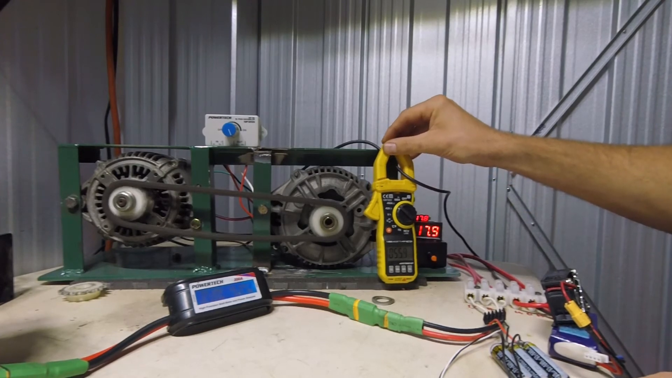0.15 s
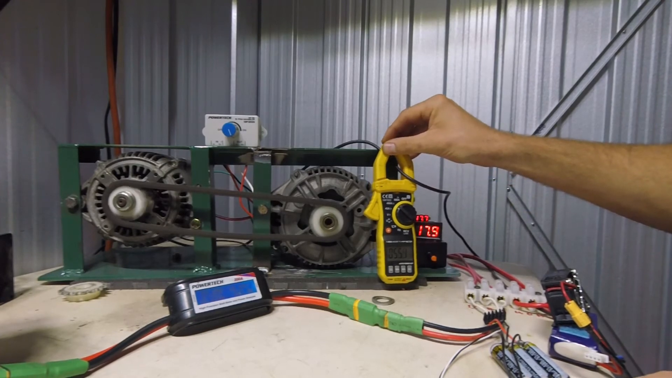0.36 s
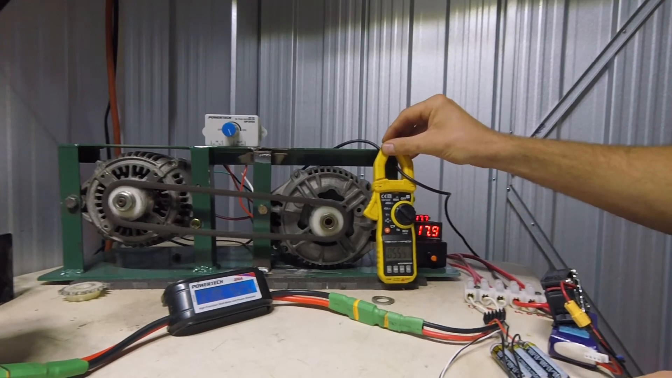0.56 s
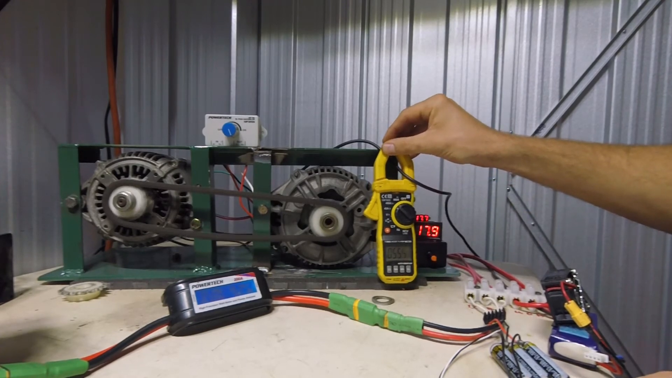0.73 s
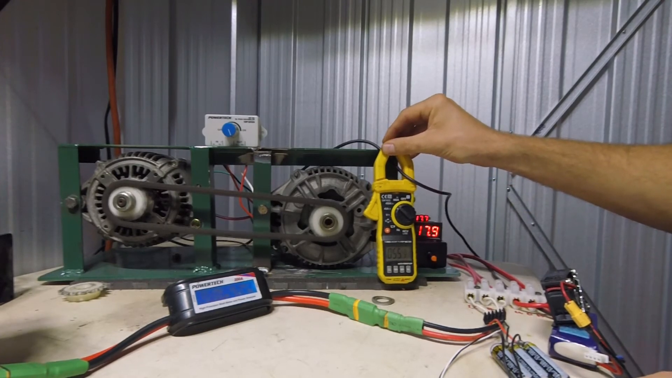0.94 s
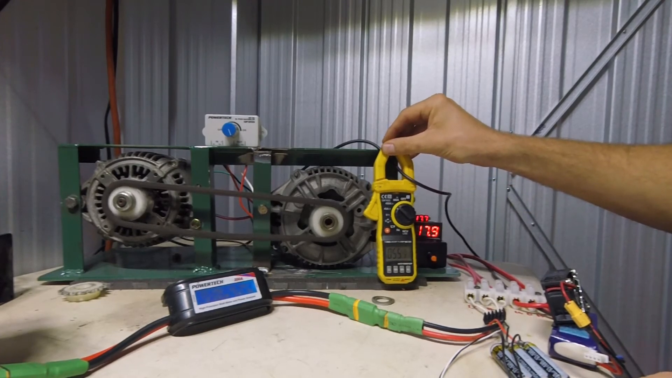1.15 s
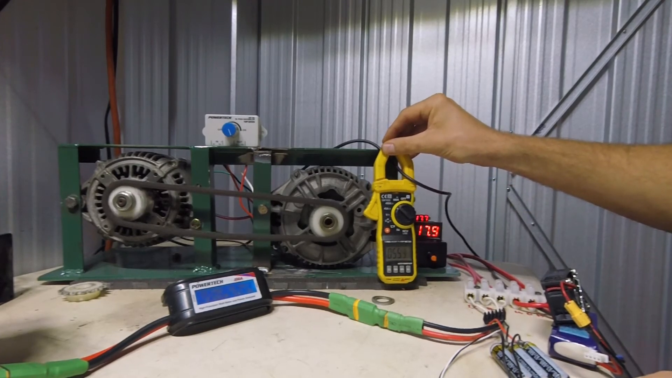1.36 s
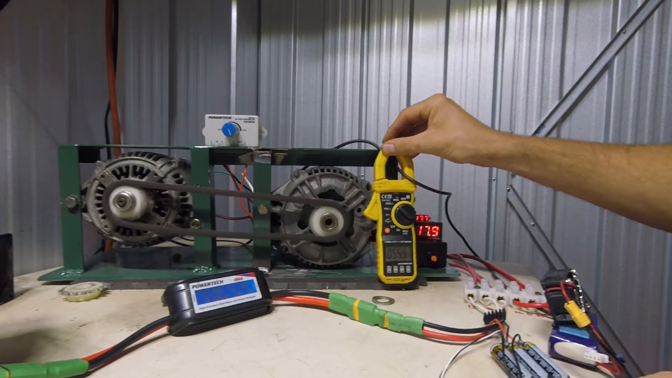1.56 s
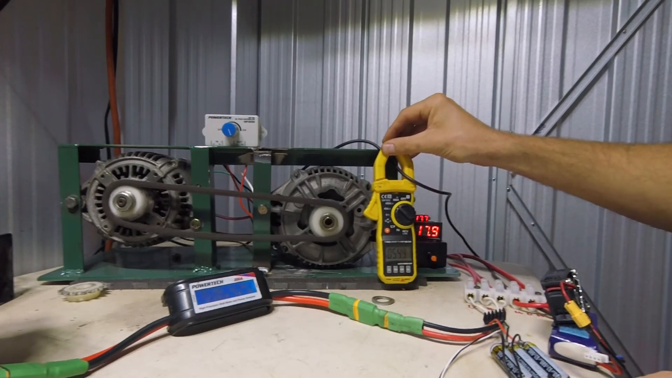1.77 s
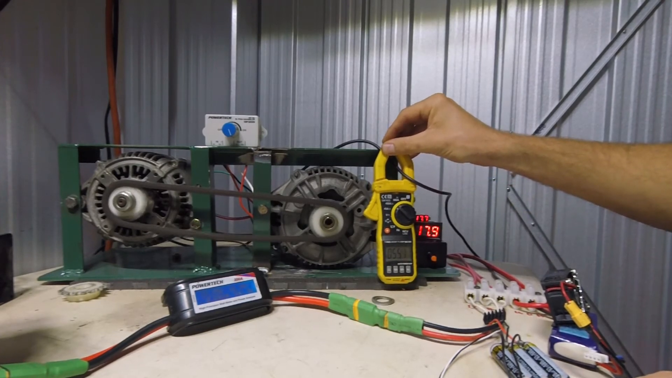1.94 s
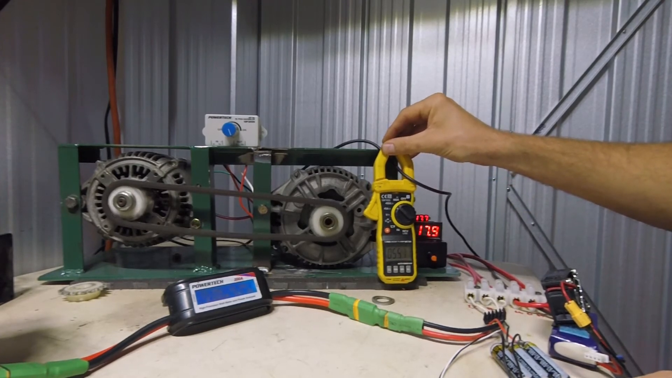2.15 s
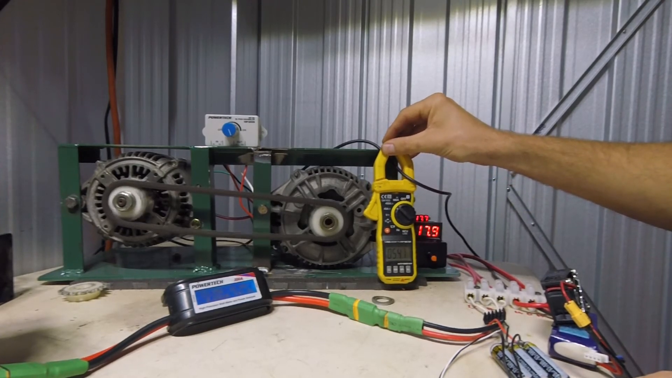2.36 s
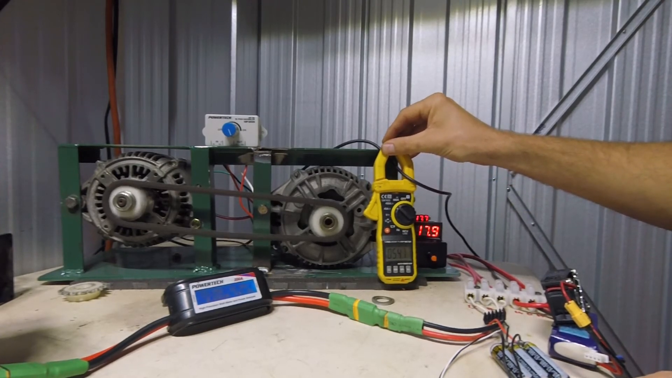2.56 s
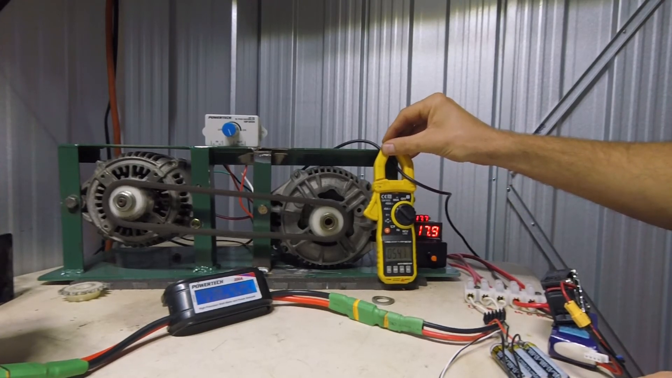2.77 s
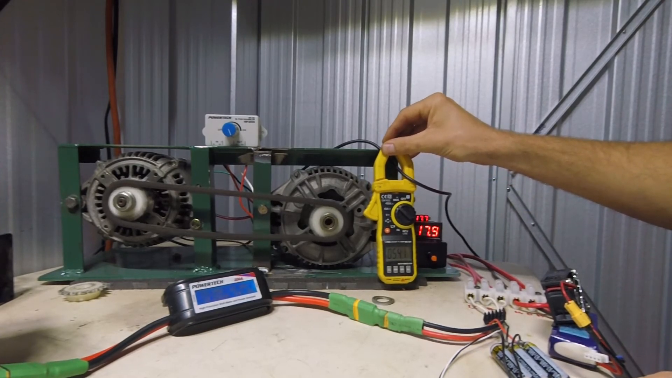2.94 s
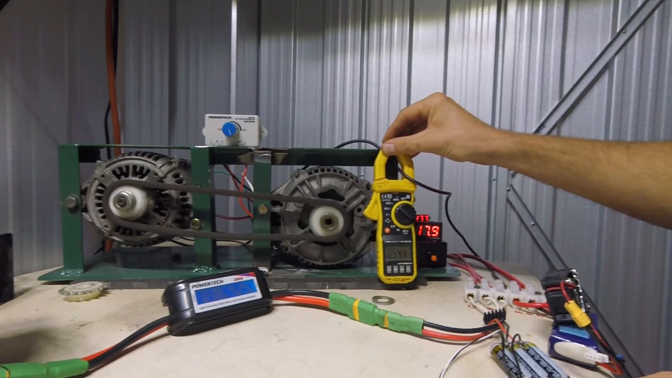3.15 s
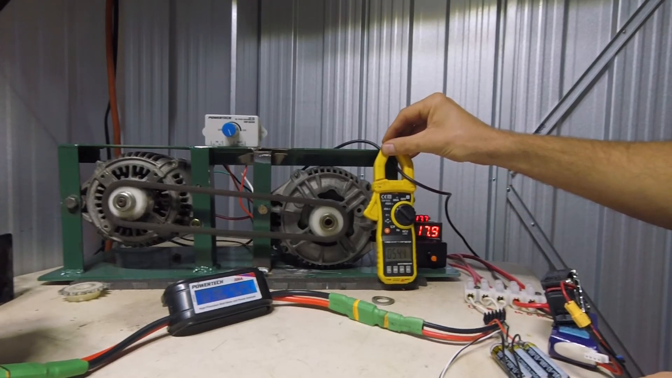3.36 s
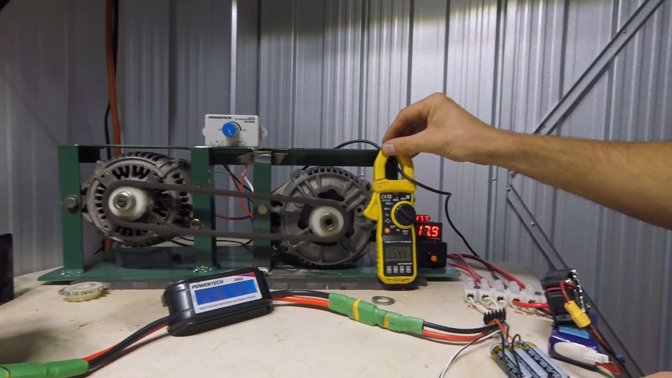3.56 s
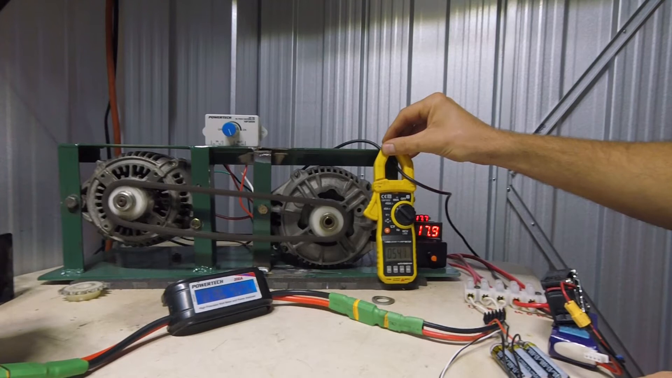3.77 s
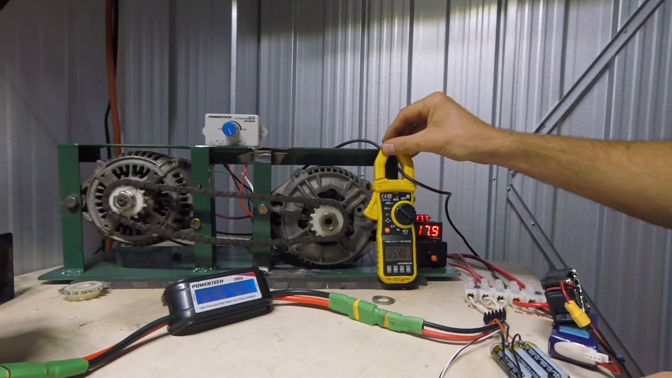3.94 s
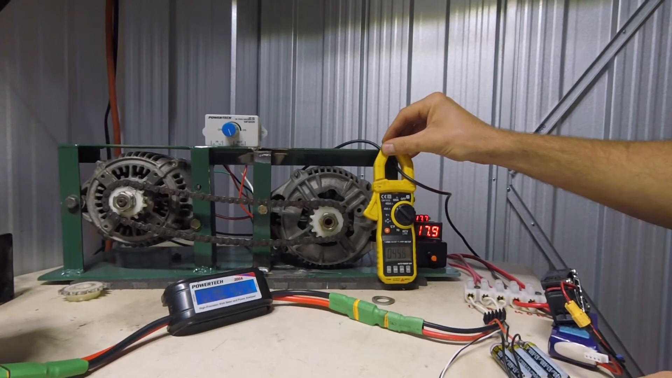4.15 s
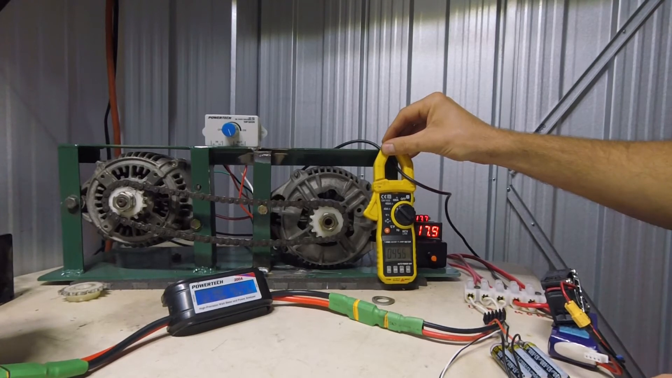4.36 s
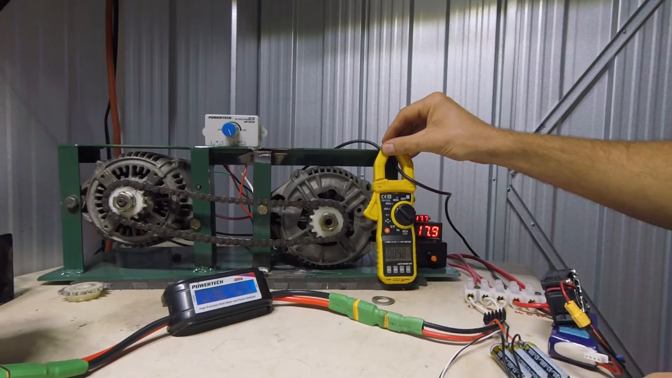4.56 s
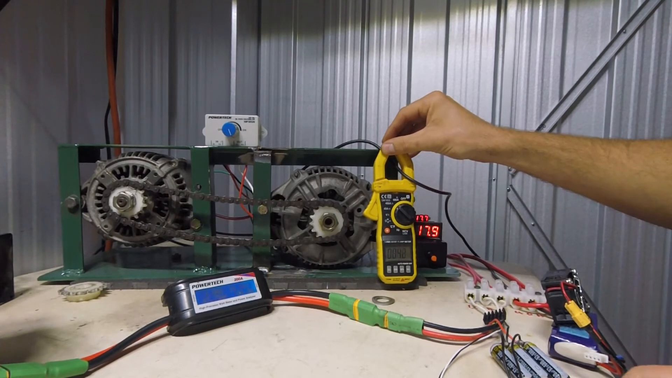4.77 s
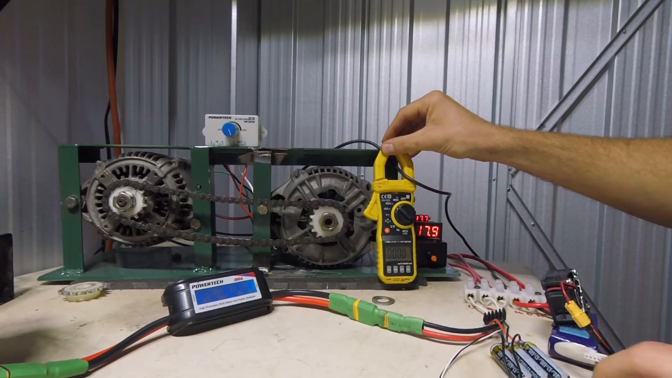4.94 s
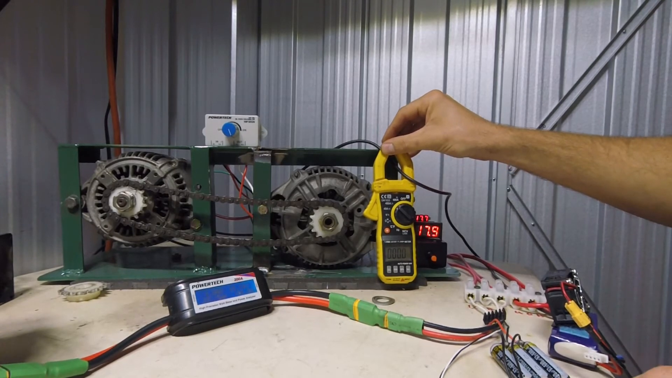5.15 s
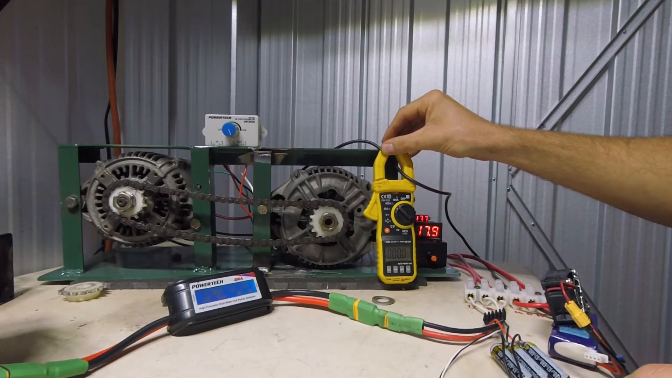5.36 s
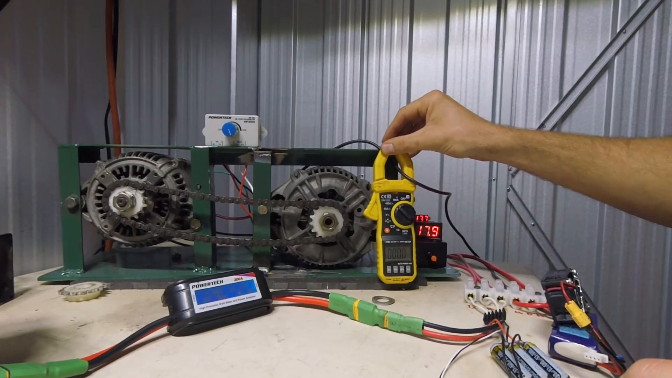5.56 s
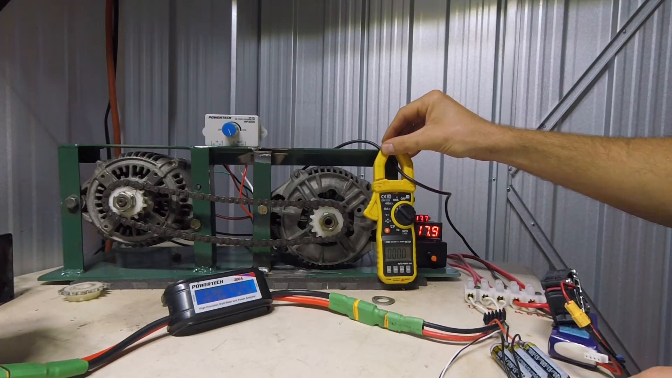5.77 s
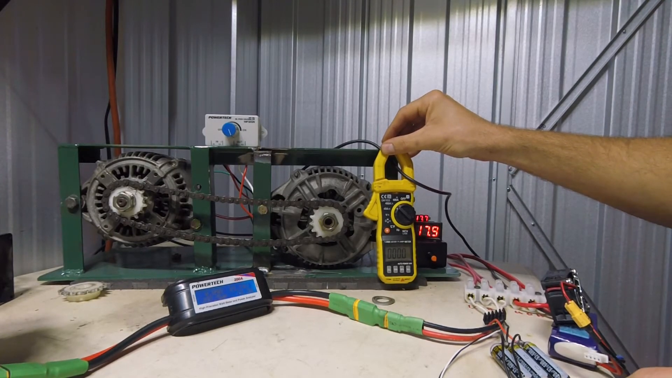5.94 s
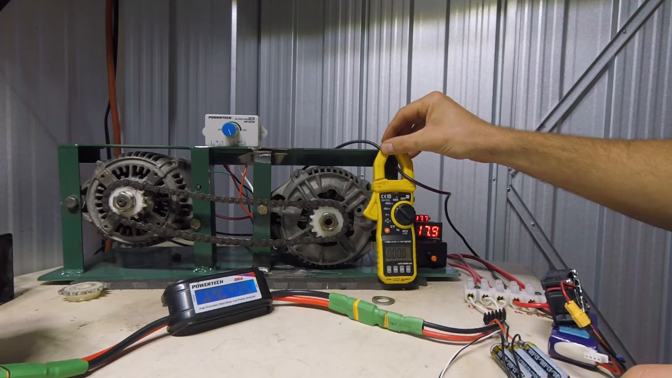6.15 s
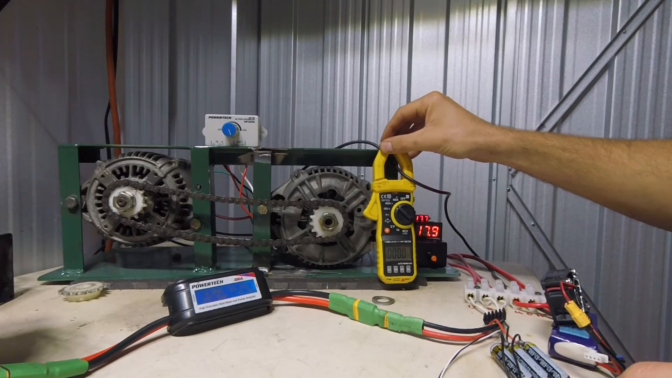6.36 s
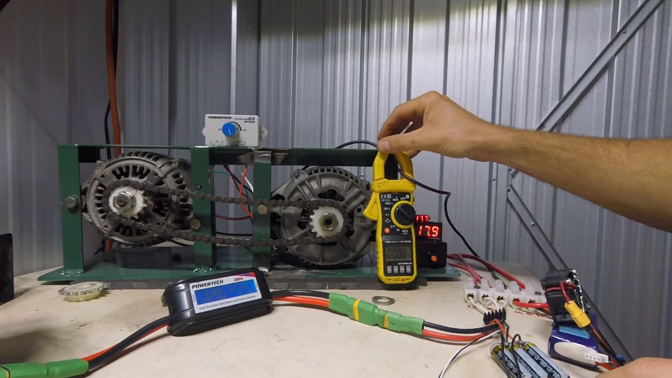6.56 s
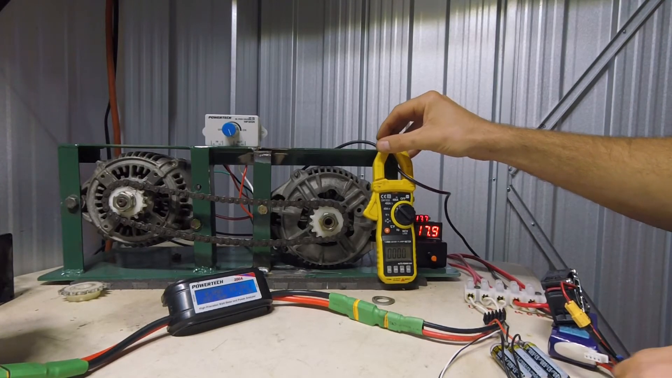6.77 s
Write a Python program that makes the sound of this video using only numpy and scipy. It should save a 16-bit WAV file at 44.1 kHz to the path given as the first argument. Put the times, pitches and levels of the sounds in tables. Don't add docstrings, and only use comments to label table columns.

```python
import sys
import numpy as np
from scipy import signal
from scipy.fft import rfft, irfft
from scipy.io import wavfile
from scipy.ndimage import uniform_filter1d

SR = 44100
rng = np.random.default_rng(int(sys.argv[2]) if len(sys.argv) > 2 else 0)


def waveform_to_disk(signal):
    frames = np.transpose(np.atleast_2d(signal))
    scaled = np.clip(frames, -1, 1) * 32767
    samples = np.round(scaled).astype(np.int16)
    wavfile.write(sys.argv[1], SR, samples)


def natural_amplitude(level_db):
    exponent = np.asarray(level_db, float) / 20
    return 10 ** exponent


N = 300321
T = np.arange(N) / SR
HZ = np.fft.rfftfreq(300000 + 2400, 1 / SR)
CUT_S = 3.76

# (time [s], turns so far [turns])
SHAFT = [
    (-.0447, -1),
    (.0548, 0),
    (.8505, 8),
    (1.3473, 13),
    (2.2463, 22),
    (3.1497, 31),
    (3.7544, 37),
    (6.9, 68),
]
TURNS = np.interp(T, *np.transpose(SHAFT))
PASSES = TURNS * 16


def evened(x):
    return x / np.sqrt(np.mean(x ** 2) + 1e-20)


def colour(points):
    hz, db = np.transpose(points)
    return natural_amplitude(np.interp(np.log(HZ + 1), np.log(hz), db, left=-120, right=-120))


def modes(peaks, steep=0.78):
    power = sum(natural_amplitude(2 * db) / (1 + (2 * (HZ - hz) / width) ** 2) ** steep for hz, width, db in peaks)
    top_hz = peaks[-1][0]
    return np.sqrt(power) / (1 + (HZ / (1.6 * top_hz)) ** 4)


def shaken(gain, drive=None):
    size = 2 * len(HZ) - 2
    force = rng.standard_normal(size)
    if drive is not None:
        force = force * np.resize(drive, size)
    return evened(irfft(rfft(force) * gain)[:N])


def drift(hz):
    return shaken(1 / (1 + (HZ / hz) ** 4))


def held(x):
    span = round(.07 * SR)
    power = uniform_filter1d(uniform_filter1d(x ** 2, span), span)
    return x / np.sqrt(abs(power) + 0.12)


def dying(start, db_per_s):
    return natural_amplitude(-db_per_s * np.maximum(T - start, 0))


def wavering(hz, db, wander, swell_db):
    phase = 2 * np.pi * (hz * T + rng.random()) + wander * drift(5.6)
    return np.sqrt(2) * natural_amplitude(db + swell_db * drift(4.5)) * np.sin(phase)


def add(mix, s, sound):
    part = mix[round(s * SR):][:len(sound)]
    part += sound[:len(part)]


def shed_air():
    # (frequency [Hz], level [dB per Hz])
    air_colour = [(40, -14), (110, -4.5), (250, -0.5), (340, -6), (450, -14), (750, -14.5), (930, -10),
                  (1150, -15.5), (1900, -20.5), (2700, -15), (3100, -22), (3900, -25.5), (4500, -33),
                  (15500, -37)]
    return natural_amplitude(-41) * shaken(colour(air_colour), natural_amplitude(.4 * drift(8)))


def cooling_fan():
    # (frequency [Hz], level [dB])
    fan_lines = [(285.3, -54), (306.8, -53), (495.3, -52.5), (689.1, -52.5), (796.7, -58), (925.9, -64),
                 (974.4, -75.5), (1136, -72), (1378, -56), (1421, -58.5), (1701, -64), (1766, -66.5),
                 (2073, -61.5), (2223, -70), (2369, -87.5), (2756, -57.5), (3451, -70), (5518, -77.5),
                 (6218, -88)]
    return sum(wavering(hz, db, wander=hz / 900, swell_db=1.0) for hz, db in fan_lines)


def knock(hz, spread, t60, count):
    t = T[:round(.15 * SR)]
    chance = rng.random((count, 3))
    place = 2 * (np.arange(count)[:, None] + chance[:, :1]) / count - 1
    cycles = hz * np.exp(spread * place) * t
    rings = np.exp(-2 * place ** 2) * np.sin(2 * np.pi * (cycles + 0.4 * chance[:, 1:2]))
    decay = natural_amplitude(-60 * t * np.exp(.5 * place) / (t60 * (.5 + chance[:, 2:])))
    onset = np.sin(np.minimum(t * hz, np.pi / 2)) ** 2
    burst = (rings * decay).sum(0) * onset
    return burst / abs(burst).max()


def finger_taps():
    # (time [s], peak level [dB], centre [Hz], time to fall 60 dB [s], dry tick against knock [dB])
    touches = [
        (4.759, -41, 1800, 0.03, 0),
        (4.82, -36, 2000, 0.06, 0),
        (4.889, -24.5, 900, .05, -20),
        (4.98, -32, 1000, .08, -16),
        (5.714, -46, 1000, .04, -8),
        (6.03, -43, 990, .04, -8),
    ]
    out = np.zeros(N)
    for s, db, hz, t60, tick_db in touches:
        hollow = knock(hz, 1.0, t60, count=14)
        dry_tick = knock(3000, 0.8, 0.12, count=24)
        add(out, s, natural_amplitude(db) * (hollow + natural_amplitude(tick_db) * dry_tick))
    return out


def swaying_bench():
    # (frequency [Hz], width [Hz], level [dB])
    thud_modes = [(31.6, 4.2, 6), (54.8, 16, -12), (78.3, 12, -1.5), (89.3, 7.6, -11.5),
                  (199.6, 10.4, -8.5)]
    # (time [s], level [dB])
    settling = [
        (3.9, -15),
        (4.03, -23),
        (4.21, -24),
        (4.5, -31),
        (4.9, -30.5),
        (5.36, -30.5),
        (5.44, -35),
        (5.9, -36),
        (6.81, -53),
    ]
    from_s, sway_hz = 3.9, 17.8
    onset = np.clip((T - from_s) / .12, 0, 1)
    rocking = np.sqrt(2) * np.sin(2 * np.pi * sway_hz * T + 0.33 * drift(3)) * natural_amplitude(2 * drift(5))
    thuds = natural_amplitude(np.interp(T, *np.transpose(settling))) * held(shaken(modes(thud_modes)))
    return onset * (natural_amplitude(-25) * dying(from_s + .25, 15) * rocking + thuds)


def surges_and_drones():
    # (middle [s], length [s], level [dB], frequency [Hz])
    surges = [(.03, .2, -21, 178), (.45, .25, -24, 178), (.95, .45, -20, 176), (1.45, .3, -22, 180),
              (1.87, .2, -20, 179), (2.13, .35, -22, 180), (.25, .15, -24, 302), (.55, .3, -24, 300),
              (1.25, .35, -23, 363), (2.15, .35, -25, 300), (3.1, .4, -25, 302)]
    # (middle [s], length [s], level [dB], frequency [Hz])
    drones = [(4.61, 1.0, -36, 136), (5.13, .3, -40, 137), (5.51, .55, -40, 136), (6.09, .3, -43, 137),
              (6.34, .35, -42, 137), (6.66, .4, -46, 137), (4.31, .2, -37, 177), (4.81, .7, -37, 177),
              (5.79, .6, -38.5, 177), (6.11, .2, -43, 177), (6.7, .55, -37, 177)]
    panel_width_hz = 1.62
    unsteady = held(shaken(1 / (1 + (2 * HZ / panel_width_hz) ** 2)) + 1.546)
    out = np.zeros(N)
    for s, length, db, hz in surges + drones:
        swell = np.cos(np.pi * np.clip((T - s) / length, -.5, .5))
        tone = np.sqrt(2) * np.sin(2 * np.pi * (hz * T + rng.random()) + .7 * drift(4))
        out += natural_amplitude(db) * swell * unsteady * tone
    return out


def jolt():
    # (start [s], hold [s], frequency [Hz], level [dB], release [dB per s])
    rung = [
        (3.785, .07, 49, -13.5, 115),
        (3.79, .05, 33, -23, 65),
        (3.76, .06, 86, -19.5, 85),
        (3.8, .1, 178, -18.5, 160),
        (3.75, .02, 214, -21, 400),
        (3.79, .04, 300, -19.5, 450),
        (3.79, .055, 397, -18.5, 500),
    ]
    rise_s = .03
    out = np.zeros(N)
    for s, hold, hz, db, release in rung:
        swell = np.clip((T - s) / rise_s, 0, 1) * dying(s + rise_s + hold, release)
        out += swell * natural_amplitude(2 * drift(36)) * wavering(hz, db, wander=.5, swell_db=.5)
    return out


def tick(hz):
    # (frequency [Hz], level [dB])
    overtones = [(4300, -7), (5100, -17), (6100, -20), (10500, -38)]
    t = T[:260] - .0013
    phase = rng.random()
    rings = 0
    for f, db in [(hz, 0)] + overtones:
        rings = rings + natural_amplitude(db) * np.cos(2 * np.pi * (f * t + phase + .2 * rng.random()))
    strike = np.exp(-.5 * (t / .00027) ** 2)
    rattle = .15 * np.exp(-.5 * ((t - .0014) / .0009) ** 2)
    return .8 * rings * (strike + rattle)


def spinning():
    return dying(CUT_S, 103)


def ball_passes():
    passing = (np.diff(np.floor(PASSES), prepend=-9) > 0) * (TURNS % .5 > .02)
    rattle_db = 9 * np.exp(-(TURNS % 1) / .1)
    size = passing * spinning() * natural_amplitude(-33 + rattle_db + 3 * rng.standard_normal(N))
    shape = rng.integers(0, 8, N)
    out = np.zeros(N)
    for k in range(8):
        out += signal.oaconvolve(size * (shape == k), tick(rng.uniform(2760, 4110)))[:N]
    return out


def bearing_flaws():
    places = [0, .5, .755]
    # (first flaw [dB], second flaw [dB], third flaw [dB])
    load_cycle = [(-23, -36, -23), (-20.5, -36, -36), (-19.5, -33, -28), (-25, -23, -36), (-18.5, -29, -21),
                  (-21, -23, -33), (-25, -22, -29), (-23, -26, -36), (-17.5, -23.5, -23.5)]
    out = np.zeros(N)
    s, turns = np.transpose(SHAFT)
    for turn in range(38):
        for place, db in zip(places, load_cycle[turn % len(load_cycle)]):
            when = np.interp(turn + place, turns, s)
            level = natural_amplitude(db + 1.0 + 1.0 * rng.standard_normal())
            hz = 3520 * np.exp(.06 * rng.standard_normal())
            add(out, when, (when < CUT_S) * level * tick(hz))
    return out


def bearing_hiss():
    # (frequency [Hz], level [dB per Hz])
    hiss_colour = [(1450, -31.5), (1650, -23.5), (1900, -10.5), (2400, -3.5), (2900, -8.5), (3600, -6.5),
                   (4300, -9), (4550, -17), (5300, -16), (5750, -15.5), (5900, -12), (6600, -21),
                   (7700, -29.5), (15500, -31)]
    ball_throb_db = 1.5 * np.cos(2 * np.pi * PASSES)
    turn_throb_db = 1 * np.cos(2 * np.pi * (TURNS - 0.034))
    throb = natural_amplitude(.9 * drift(40) + ball_throb_db + .3 * drift(12) + turn_throb_db)
    return natural_amplitude(-34.5) * spinning() * shaken(colour(hiss_colour), throb)


def ringing_cases():
    # (frequency [Hz], width [Hz], level [dB])
    case_modes = [(483.2, 4.9, -2), (501, 44, -13.5), (624.3, 9.6, -8), (666, 17, -11), (744, 13, -7),
                  (850, 24, -11.5), (901.5, 6.4, -1), (968, 30, -7), (1066, 11, -2), (1120, 42, -6),
                  (1112, 9.2, -11), (1169, 8.5, 0), (1270, 9.9, -6.5), (1285, 15, -6.5), (1366, 44, -7),
                  (1387, 21, -3.5), (1492, 25, -8), (1646, 14, -14)]
    coasting = dying(CUT_S, 70) * dying(3.855, 105)
    return natural_amplitude(-22) * coasting * shaken(modes(case_modes, steep=0.76), natural_amplitude(0.16 * drift(30)))


def shaken_rig():
    # (frequency [Hz], width [Hz], level [dB])
    bench = [(17.8, 3, -10), (35, 10, -15.5), (50.7, 1.2, 11.5), (88.5, 8.4, -2), (104, 10, -37)]
    # (frequency [Hz], width [Hz], level [dB])
    boards = [(125.5, 5.6, -14.5), (153, 4, -12), (178.5, 3.6, 0)]
    # (frequency [Hz], width [Hz], level [dB])
    frame = [(228, 24, -20.5), (304, 19.3, 5.5), (332.4, 15, -1.5), (365.9, 7.5, 4.5), (399, 35, -7),
             (413.4, 39, -15)]
    laps = TURNS / 4.5
    boards_db = -26 + 2 * np.cos(2 * np.pi * (laps + 0.053))
    out = natural_amplitude(-25.5) * shaken(modes(bench))
    out += natural_amplitude(boards_db) * shaken(modes(boards))
    out += natural_amplitude(-23) * shaken(modes(frame))
    return out * dying(3.84, 150)


def slot_whines():
    # (frequency [Hz], level [dB])
    whines = [(760, -35), (970, -32), (1098, -35), (1172, -49.5), (1357, -29)]
    current = np.clip((3.8 - T) / 0.069, 0, 1)
    return current * sum(wavering(hz, db, wander=0.54, swell_db=1.5) for hz, db in whines)


def windings():
    # (time [s], frequency [Hz], level [dB])
    hum = [
        (0, 70, -13.5),
        (.6, 70.13, -14),
        (1.3, 70.6, -13.5),
        (1.9, 69.99, -14.5),
        (2.4, 69.34, -14),
        (3.102, 70.2, -13.5),
        (3.74, 69.86, -14),
        (3.8, 66.1, -16),
    ]
    # (multiple of hum [times], level under hum [dB], unsteadiness [0-1])
    multiples = [(2, -18, .3), (3, -12, .25)]
    s, hz, db = np.transpose(hum)
    cycles = np.cumsum(np.interp(T, s, hz)) / SR + .75
    tone = np.sin(2 * np.pi * cycles) * (1 + 0.069 * drift(2.3))
    for k, under_db, unsteady in multiples:
        wander = unsteady * drift(2.4)
        flutter = 1 + unsteady * drift(14.0)
        tone += natural_amplitude(under_db) * flutter * np.sin(2 * np.pi * k * cycles + wander)
    current = np.clip((3.81 - T) / 0.02, 0, 1)
    return np.sqrt(2) * natural_amplitude(np.interp(T, s, db)) * current * tone


def scene():
    background = shed_air() + cooling_fan() + finger_taps()
    stopping = swaying_bench() + surges_and_drones() + jolt()
    bearing = ball_passes() + bearing_flaws() + bearing_hiss()
    machine = ringing_cases() + shaken_rig() + slot_whines() + windings()
    return (background + stopping + bearing + machine)[None]


def roll_off(x):
    return signal.sosfilt(signal.butter(12, 15290, fs=SR, output="sos"), x)


def record(dry):
    # (frequency [Hz], gain [dB])
    microphone = [(1, 3.5), (5700, -0.5), (6250, 6), (7200, 1), (11200, -3), (11700, -6.5), (15500, -18),
                  (22050, -6)]
    hz = HZ[::300]
    response = signal.firwin2(511, hz / hz[-1], colour(microphone)[::300])
    padded = np.pad(dry, ((0, 0), (255, 255)), "reflect")
    heard = signal.oaconvolve(padded, response[None], "valid")
    ceiling = 1.8
    return roll_off(ceiling * np.tanh(heard / ceiling))


dry = scene()
out = record(dry)
waveform_to_disk(out)
```